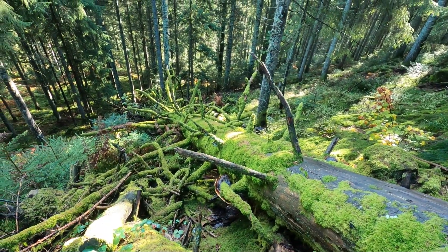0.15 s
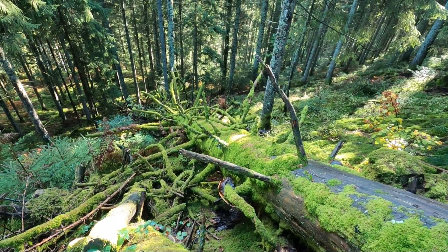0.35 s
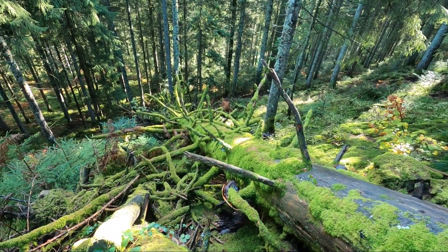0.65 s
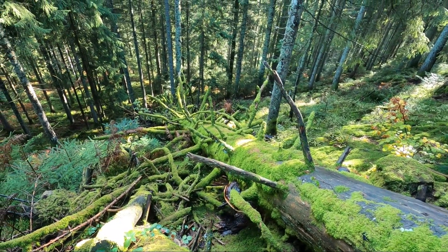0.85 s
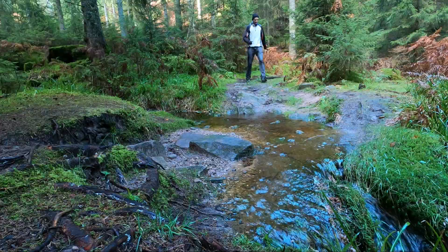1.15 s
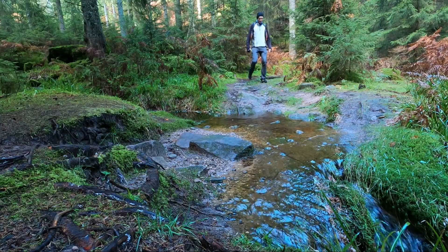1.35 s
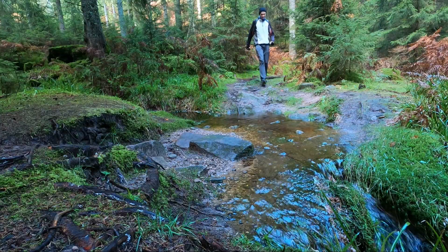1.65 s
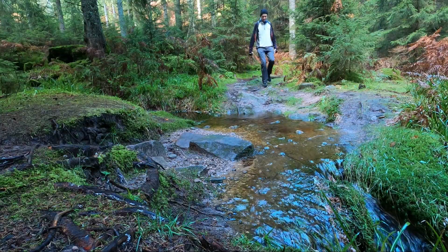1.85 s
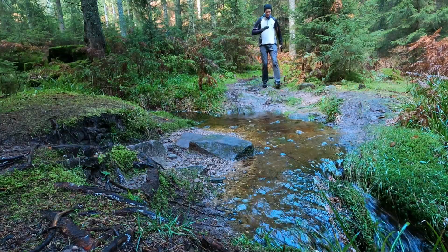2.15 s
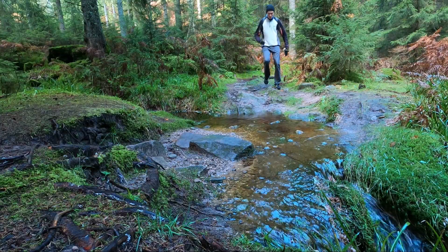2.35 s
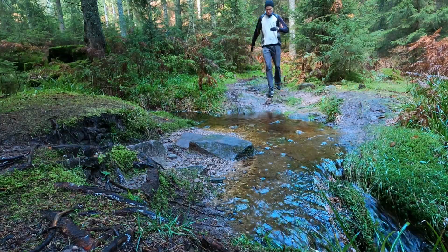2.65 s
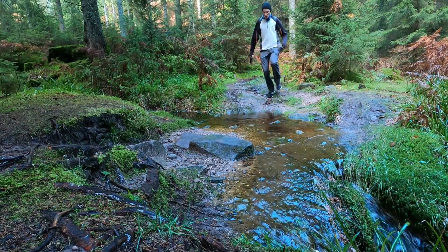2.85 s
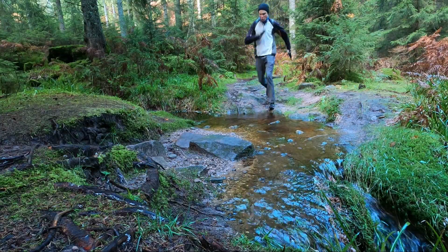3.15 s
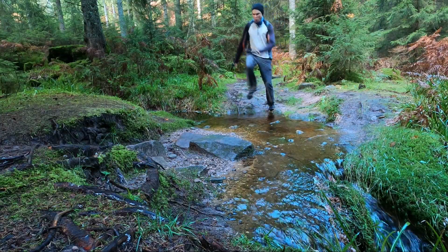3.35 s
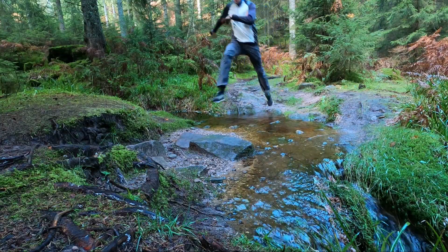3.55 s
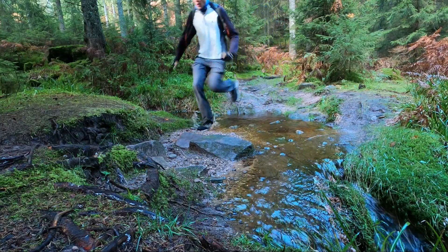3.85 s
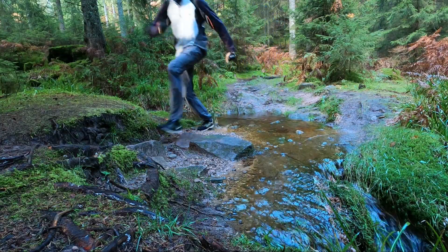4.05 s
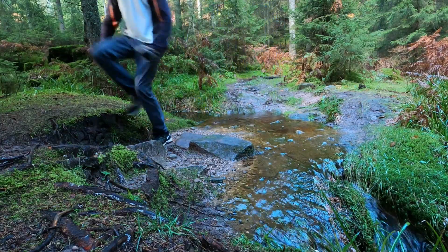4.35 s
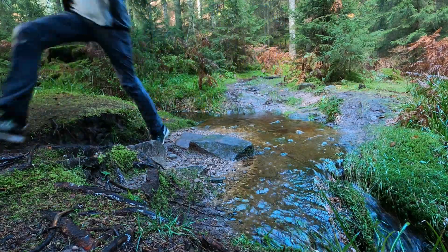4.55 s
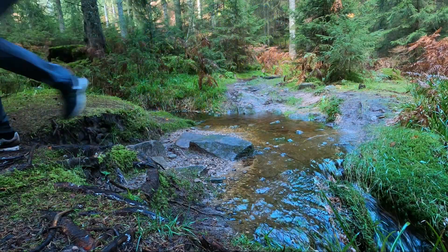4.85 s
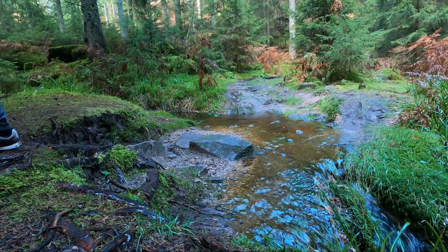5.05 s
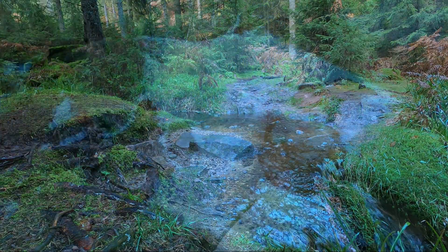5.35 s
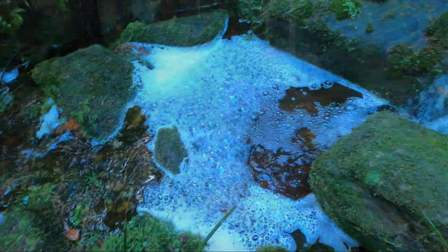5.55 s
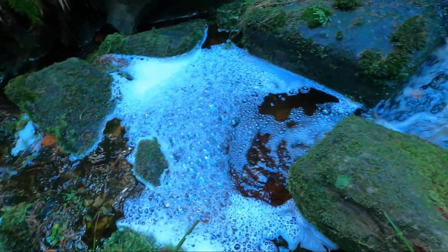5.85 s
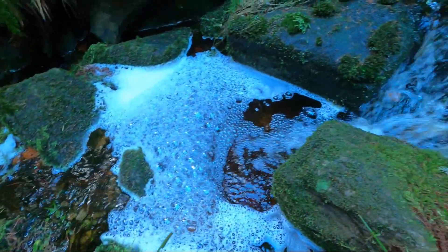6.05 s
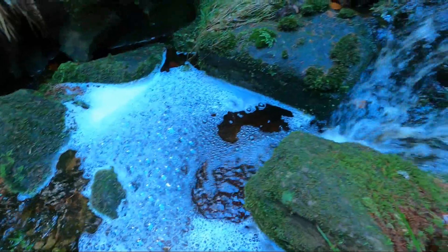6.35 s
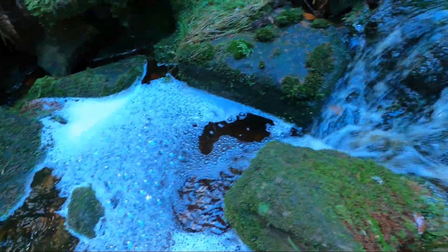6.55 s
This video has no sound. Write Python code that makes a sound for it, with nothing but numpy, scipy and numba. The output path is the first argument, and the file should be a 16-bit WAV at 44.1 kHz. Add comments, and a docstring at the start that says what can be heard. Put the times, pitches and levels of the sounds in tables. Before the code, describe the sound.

For the first second there is only a very faint forest hush, a distant rush with a few soft, low thumps. At about 1 second a small brook cuts in abruptly, babbling steadily over stones, wide and slightly to the right, with little gulps, flicks of spray and bright drips. Running footsteps begin softly at about 2.8 and 3.2 seconds. The loudest lands near 3.9 seconds, a thud with a crunch of wet grit and clicking pebbles. Another follows at 4.3, a deeper thud on springy, mossy ground at 4.7, and a lighter one at 5.3. Between 5.2 and 5.7 seconds the brook crossfades into a louder, closer, centred cascade falling into a foaming pool. It bubbles densely with deep glugs, growing slightly brighter until the end at around 6.7 seconds.

```python
"""A small brook, heard at a wide, shallow ford and then at a foaming pool under a cascade.
Its sound is the resonance of entrained air: swarms of ringing bubbles over a fine wash, with larger
gulps, spray and stray drops. A hushed forest precedes it. Someone runs across the ford: the shoes
crack pebbles, scuff wet grit and thud on springy, mossy ground."""
import sys
import numpy as np
from scipy.fft import rfft, irfft, next_fast_len
from scipy.io import wavfile
from scipy.ndimage import map_coordinates
from numba import njit

SR = 44100
rng = np.random.default_rng(int(sys.argv[2]) if len(sys.argv) > 2 else 0)


def waveform_to_disk(signal):
    """Save audio, clipped to [-1, 1], as 16-bit WAV at the path in sys.argv[1]."""
    frames = np.transpose(np.atleast_2d(signal))
    scaled = np.clip(frames, -1, 1) * 32767
    samples = np.round(scaled).astype(np.int16)
    wavfile.write(sys.argv[1], SR, samples)


N = 295470
TIME = np.arange(N) / SR
FORD_START_S, POOL_FADE_S = 1.0188, (5.21, 5.68)
FORD_DB, POOL_DB = -38.5, -32


def amp(db):
    """Decibels to amplitude ratio."""
    return 10 ** (np.asarray(db) / 20)


def unit(x):
    """Normalisation to rms 1."""
    return x / np.sqrt(np.mean(x ** 2) + 1e-20)


def wobble(rate):
    """Smooth random modulation: a spline through rate knots a second."""
    return map_coordinates(rng.standard_normal(int(N * rate / SR) + 4), [TIME * rate])


def along(points, hz):
    """Gains interpolated in log frequency from (frequency [Hz], level [dB]) points."""
    knots_hz, db = np.transpose(points)
    return amp(np.interp(np.log(hz + 1), np.log(knots_hz), db))


def filtered(x, response):
    """Linear filtering: the spectrum of x times a frequency response."""
    size = next_fast_len(N + 8192)
    return irfft(rfft(x, size) * response(np.fft.rfftfreq(size, 1 / SR)), size)[..., :N]


def coloured(x, points):
    """Spectral shaping that conserves the power of white x."""
    return filtered(x, lambda hz: unit(along(points, hz)))


def add(track, s, sound):
    """Superposition of a sound on a track at time s."""
    part = track[max(round(s * SR), 0):][:len(sound)]
    part += sound[:len(part)]


def swell(t, peak_at, steep):
    """A gamma envelope: it rises to 1 at peak_at and dies away."""
    return (t / peak_at * np.exp(1 - t / peak_at)) ** steep


def wash():
    """Countless tiny independent events sum to Gaussian white noise."""
    return rng.standard_normal(N)


def widen(x, side_levels):
    """Decorrelation: noise in opposite phase in the two channels gives stereo width."""
    side = filtered(wash(), lambda hz: along(side_levels, hz))
    return unit(x) + np.array([side, -side])


def forest():
    """Ambient noise: a far rush among the trees, slow air at the microphone and soft, low thumps."""
    # spectra of the rush and the air: (frequency [Hz], relative level [dB])
    rush_colour = [(60, -11), (120, -9.5), (188, 2), (268, -6), (400, -7.5), (800, -11), (1700, -10.5),
                   (3200, -23), (5600, -28), (7500, -37), (15000, -54)]
    air_colour = [(10, -9), (30, 7), (65, -2), (105, -17), (200, -52), (2000, -100)]
    # diffuse field: (frequency [Hz], level re direct sound [dB])
    diffuse = [(100, -13), (1000, -15), (2500, -8), (6500, -7), (9000, -1)]
    # thumps: (time [s], level [dB], frequency [Hz])
    thump_events = [(.045, -56.5, 62), (.075, -63, 56), (.29, -67, 35), (.415, -59, 38), (.52, -66, 38),
                    (.625, -63, 48), (.76, -64, 32), (.94, -63, 34)]
    rush = coloured(widen(wash(), diffuse), rush_colour) * amp(-71 + 0.7 * wobble(9.7))
    air = coloured(widen(wash(), diffuse), air_colour) * amp(-76)
    thumps, t = np.zeros(N), np.arange(SR // 5) / SR
    for s, db, hz in thump_events:
        add(thumps, s, amp(db) * swell(t, peak_at=0.024, steep=3.1) * np.sin(2 * np.pi * hz * t))
    return rush + air + thumps


def cracks(pitch_spread=0.092, dull_hz=6300):
    """Modal ringing: wet pebbles snap together under the shoe, each at slightly different pitches."""
    # impacts: (time [s], level [dB])
    impacts = [(3.8718, -14.5), (3.8754, -20), (3.9008, -20), (3.907, -19), (3.919, -17), (4.289, -25),
               (4.736, -22)]
    # pebble modes: (frequency [Hz], relative level [dB], decay time T60 [s])
    modes = [(990, -3.5, 0.0082), (1750, -15, 0.0065), (2660, -9, 0.0063), (3860, -7, 0.0082),
             (5050, -11, 0.0072)]
    out, t = np.zeros(N), np.arange(SR // 40) / SR
    for s, db in impacts:
        for hz, mode_db, t60 in modes:
            pitch = hz * np.exp(pitch_spread * rng.standard_normal())
            envelope = amp(db + mode_db - 60 * t / t60)
            add(out, s, rng.choice([-1, 1]) * envelope * np.sin(2 * np.pi * pitch * t))
    return filtered(out, lambda hz: 1 / (1 + (hz / dull_hz) ** 8))


def footsteps(ground_hz=44, click_t60_s=0.015, crush_s=0.007, settle_t60_s=0.11):
    """Impact and friction: shoes thud and crunch on grit, peaty ground bounces, loose soil shudders."""
    # footfalls: (time [s], heel-to-sole roll [s], thud level [dB], thud frequency [Hz],
    # bounce level [dB], grit level [dB])
    footfalls = [(2.793, 0.02, -41, 150, -66, -44), (3.227, 0.0173, -39, 150, -54, -38.5),
                 (3.8715, 0.0277, -18.5, 158, -40, -26), (4.267, .015, -27.5, 269, -42, -36),
                 (4.714, .008, -23, 182, -25.5, -36.5), (5.313, .026, -30, 295, -53, -38.5)]
    # low thuds under the last footfall, then one soft final step: (time [s], level [dB], frequency [Hz])
    low_thuds = [(5.308, -45, 72), (5.337, -41.5, 79), (5.445, -45, 80)]
    # spectra of wet grit and soil: (frequency [Hz], relative level [dB])
    grit_colour = [(50, -1), (180, 8), (330, 2.5), (600, 5), (1200, -1), (2400, -8), (4200, -4.5),
                   (6500, -15), (10000, -35), (16000, -46)]
    soil_colour = [(15, -9), (35, -1), (80, 3), (200, -9), (600, -19), (3000, -82)]
    thuds, shaking, pressure = np.zeros((3, N))
    t = np.arange(SR // 3) / SR
    for s, roll_s, thud_db, thud_hz, bounce_db, grit_db in footfalls:
        # the heel clicks, then the grit rasps while the foot rolls
        click = amp(-6 - 60 * t / click_t60_s)
        rasp = amp(-8.5) * (t < roll_s)
        add(pressure, s, amp(grit_db) * (click + rasp))
        # the sole lands; the grit is crushed and settles
        sole_s = s + roll_s
        knock = amp(thud_db) * swell(thud_hz * t, 0.7, 1.14) * np.sin(2 * np.pi * thud_hz * t)
        bounce = amp(bounce_db) * swell(t, 0.044, 3.6) * np.sin(2 * np.pi * ground_hz * t)
        add(thuds, sole_s, knock + bounce)
        add(pressure, sole_s, amp(grit_db - 60 * np.maximum(t - crush_s, 0) / settle_t60_s))
        add(shaking, sole_s, amp((thud_db + bounce_db) / 2 - 12) * swell(t, 0.019, 0.8))
    for s, db, hz in low_thuds:
        add(thuds, s, amp(db) * swell(t, peak_at=0.011, steep=1.9) * np.sin(2 * np.pi * hz * t))
    soil = shaking * widen(wash(), [(30, -12), (300, -19)])
    grit = pressure * amp(0.59 * wobble(1000)) * widen(wash(), [(300, -24), (4000, -3)])
    return thuds + coloured(soil, soil_colour) + coloured(grit, grit_colour) + cracks()


def sprays(width_octaves=0.34, rise_s=0.00077, t60_s=0.042):
    """A breaking wavelet throws tiny droplets, which sum to a burst of band-limited noise."""
    # bursts of spray: (time [s], level [dB], centre frequency [Hz])
    bursts = [(1.715, -31.5, 3350), (1.858, -28.5, 3600), (1.859, -34, 5460), (2.467, -31.5, 4400),
              (2.867, -31, 3620), (2.909, -31, 4000), (3.243, -37, 4000), (3.013, -36, 4100),
              (3.732, -38, 4540), (4.162, -27, 3330), (4.471, -37, 4000), (5.786, -30, 3680),
              (6.183, -28.5, 3500)]
    out, t = np.zeros(N), np.arange(SR // 10) / SR
    hz = np.fft.rfftfreq(len(t), 1 / SR) + 1
    for s, db, centre_hz in bursts:
        band = np.exp(-.5 * (np.log2(hz / centre_hz) / width_octaves) ** 2)
        droplets = unit(irfft(rfft(rng.standard_normal(len(t))) * band, len(t)))
        add(out, s, droplets * np.minimum(t / rise_s, 1) * amp(db - 60 * t / t60_s))
    return out


def drops(peak_cycles=1.56, glide=0.0031):
    """Air entrainment: a drop hits the surface and traps a tiny bubble, which rings as a bright plink."""
    # drops falling close by: (time [s], level [dB], frequency [Hz])
    drop_events = [(1.147, -30, 3240), (1.158, -38, 5330), (1.849, -38, 7780), (2.026, -36, 6960),
                   (2.604, -30.5, 6700), (2.759, -25, 5630), (2.76, -39, 7650), (3.013, -19.5, 4250),
                   (3.345, -28, 5500), (3.732, -21, 4870), (5.268, -34, 6800)]
    out, t = np.zeros(N), np.arange(SR // 50) / SR
    for s, db, hz in drop_events:
        turns = hz * t
        chirp = np.sin(2 * np.pi * turns * (1 + glide * turns))
        add(out, s, amp(db) * swell(turns, peak_cycles, 1) * chirp)
    return out


def gulps(per_s=3.1, low_hz=640, high_hz=1610, peak_cycles=1.37, glide=0.0027):
    """Large air pockets close under water and resonate for a few cycles, rising in pitch."""
    # the largest bubbles: (time [s], level [dB], frequency [Hz])
    largest = [(1.05, -24, 2730), (1.102, -28.5, 905), (1.258, -32, 585), (1.764, -34.5, 710),
               (1.801, -30, 590), (2.129, -26, 1250), (2.143, -26.5, 705), (2.202, -30.5, 600),
               (2.279, -29.5, 760), (2.745, -33.5, 576), (2.774, -23.5, 1230), (2.927, -28, 970),
               (3.107, -27.5, 850), (3.116, -26, 940), (3.172, -28, 885), (3.431, -31.5, 680),
               (4.063, -28, 870), (4.162, -23.5, 870), (4.335, -24, 1470), (5.105, -30, 905),
               (5.536, -22, 1230), (5.68, -23.5, 750), (5.699, -21.5, 1160), (5.787, -19.5, 1530),
               (5.949, -27, 730), (6.032, -23.5, 840), (6.096, -19, 780), (6.28, -27, 1720),
               (6.45, -21, 760), (6.647, -24.5, 734)]
    lesser = []  # these come by chance, 0 to 4 dB above the flow
    for when, smallness, pitch in rng.random((int(per_s * N / SR), 3)):
        s = when * N / SR
        flow_db = np.interp(s, POOL_FADE_S, [FORD_DB, POOL_DB])
        lesser.append((s, flow_db + 4 * (1 - smallness), low_hz * (high_hz / low_hz) ** pitch))
    out, t = np.zeros(N), np.arange(SR // 20) / SR
    for s, db, hz in list(largest) + lesser:
        turns = hz * t
        chirp = np.sin(2 * np.pi * turns * (1 + glide * turns))
        add(out, s, amp(db) * swell(turns, peak_cycles, 0.82) * chirp)
    return out


@njit
def ring(n, sr, start, pitch, cycles, gain, glide):
    """Damped oscillators: sines that start softly and rise in pitch as they decay."""
    out = np.zeros(n)
    for k in range(len(start)):
        life = cycles[k] / pitch[k]
        for i in range(int(start[k] * sr) + 1, min(int((start[k] + life) * sr), n)):
            t = i / sr - start[k]
            turns = pitch[k] * t * (1 + glide * t / life)
            out[i] += gain[k] * min(2 * turns, 1) * np.exp(-5 * t / life) * np.sin(2 * np.pi * turns)
    return out


def bubbles(per_s, low_hz, high_hz, cycles, scatter_db):
    """Bubble resonance: many small, high bubbles and fewer large, low ones sum to an even spectrum."""
    count = int(per_s * N / SR)
    when, smallness, sign = rng.random((3, count))
    strength, life = np.clip(rng.standard_normal((2, count)), -2, 2)
    pitch = (np.sqrt(low_hz) + smallness * (np.sqrt(high_hz) - np.sqrt(low_hz))) ** 2
    gain = np.sign(sign - .5) * amp(scatter_db * strength) * pitch ** (3 / 4)
    return unit(ring(N, SR, when * N / SR, pitch, cycles * np.exp(.5 * life), gain, glide=0.1265))


def pool(brighten_db_per_s=4, treble_hz=2700, neutral_s=6.06):
    """A plunging cascade entrains air: dense foam and deep glugs resonate in one narrow spot."""
    # spectrum of the pool: (frequency [Hz], relative level [dB])
    colour = [(25, -22), (90, -25), (125, -17.5), (180, -0.5), (320, -11.5), (530, -3.5), (770, -2.5),
              (1050, -3), (1650, -4.5), (1950, -8.5), (3800, -10), (6200, -18), (8000, -27.5), (11000, -38),
              (12600, -38), (15500, -43)]
    # stereo width, nearly mono with the faint top treble wide: (frequency [Hz], side level re mid [dB])
    width = [(100, -25), (1200, -67), (2400, -58), (4500, -33), (7300, -25), (9000, -8), (12500, -4),
             (15000, -10)]
    foam = bubbles(per_s=5500, low_hz=304.4, high_hz=13950, cycles=14.5, scatter_db=2)
    glugs = bubbles(per_s=110, low_hz=657, high_hz=1884, cycles=27, scatter_db=4.5)
    water = widen(foam + amp(-16) * glugs + amp(3) * wash(), width)
    flicker = amp(0.059 * wobble(17) + 1.12 * wobble(70))
    water = coloured(water * flicker, colour) * amp(POOL_DB)
    # the treble grows as the microphone turns toward the cascade
    body = filtered(water, lambda hz: 1 / (1 + (hz / treble_hz) ** 2))
    return body + (water - body) * amp(brighten_db_per_s * (TIME - neutral_s))


def ford(surge_db=0.84, open_s=0.18):
    """Shallow water ripples over stones in gentle surges: bubbles resonate over droplet ticks and wash."""
    # spectrum of the ford: (frequency [Hz], relative level [dB])
    colour = [(25, -25), (90, -26), (120, -18), (160, -1.5), (200, 1), (250, -7.5), (310, -3.5), (450, -5),
              (780, -5.5), (940, -2), (1300, -3.5), (1700, -5.5), (3600, -10.5), (6600, -18), (8200, -30.5),
              (12100, -38), (15500, -46.5)]
    # diffuse field: (frequency [Hz], level re direct sound [dB])
    diffuse = [(100, -26), (700, -15), (2000, -8.5), (5000, -2), (6100, -1.5), (7500, -18), (10000, -16),
               (15000, -8)]
    babble = bubbles(per_s=3200, low_hz=218.7, high_hz=13740, cycles=16.2, scatter_db=3.5)
    plinks = bubbles(per_s=110, low_hz=905, high_hz=10020, cycles=53, scatter_db=-1)
    gurgle = bubbles(per_s=130, low_hz=886, high_hz=1408, cycles=25, scatter_db=1)
    ticks = bubbles(per_s=90, low_hz=2650, high_hz=7450, cycles=5.8, scatter_db=2)
    water = widen(babble + amp(-17) * gurgle + amp(-9) * plinks + amp(-10) * ticks + wash(), diffuse)
    flicker = amp(.7 * wobble(14) + .4 * wobble(70))
    water = coloured(water * flicker, colour) * amp(FORD_DB + surge_db * wobble(4.8))
    # the top treble opens up over the first moments
    dullness = np.clip(1 - (TIME - FORD_START_S) / open_s, 0, .6)
    treble = filtered(water, lambda hz: 1 - 1 / (1 + (hz / 6000) ** 10))
    return water - dullness * treble


def from_right(x, lag_s=55e-6, below_hz=6100):
    """Localisation: the brook sounds from the right, louder there and, below the top treble, earlier."""
    # channel difference: (frequency [Hz], level of right re left [dB])
    # the recorder's right channel is also brighter at the very top
    right_excess = [(150, 0), (900, 2.5), (6000, 2.5), (7100, 3), (8400, 1.5), (10500, 0), (15000, 6)]
    sides = np.array([[-.5], [.5]])
    delay = lambda hz: np.exp(2j * np.pi * hz * lag_s * sides / (1 + (hz / below_hz) ** 20))
    return filtered(x, lambda hz: delay(hz) * along(right_excess, hz) ** sides)


def scene():
    """The forest hush gives way abruptly to the ford, which crossfades into the pool; footsteps add on."""
    at_brook = np.clip((TIME - FORD_START_S) / .002, 0, 1)
    near_pool = np.interp(TIME, POOL_FADE_S, [0, 1])
    splashes = gulps() + sprays() + drops()
    brook = from_right(ford() + splashes) * (1 - near_pool) + (pool() + splashes) * near_pool
    return at_brook * brook + (1 - at_brook) * forest() + footsteps()


def record(dry):
    """Band limiting: a steep low-pass removes the highest treble."""
    top_hz, edge_hz = 15750, 200
    return filtered(dry, lambda hz: np.clip((top_hz - hz) / edge_hz + .5, 0, 1))


dry = scene()
out = record(dry)
waveform_to_disk(out)
```